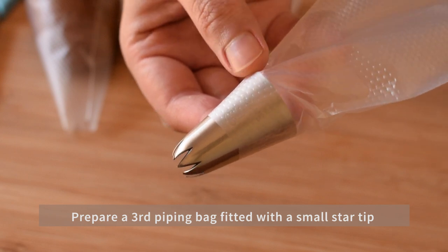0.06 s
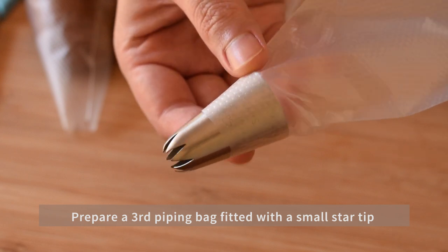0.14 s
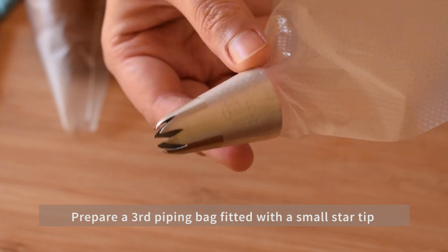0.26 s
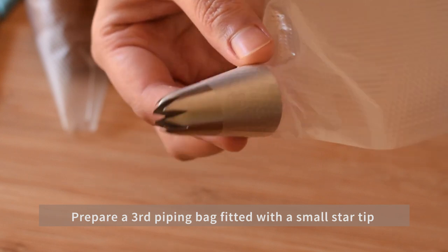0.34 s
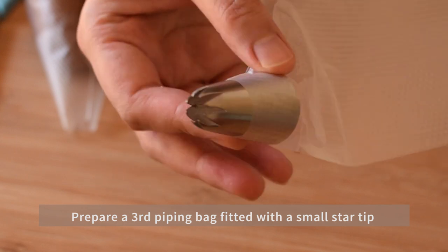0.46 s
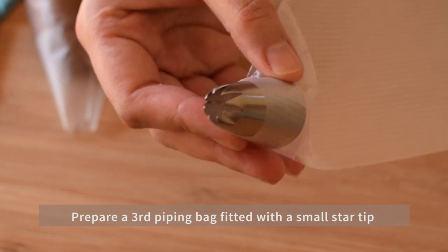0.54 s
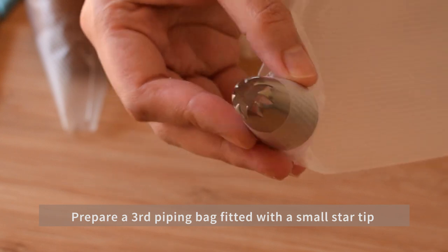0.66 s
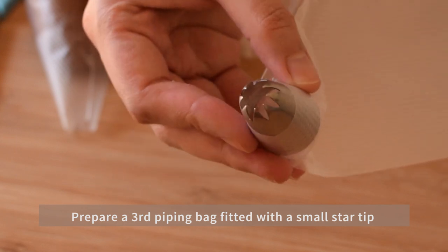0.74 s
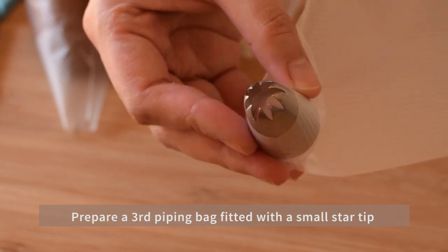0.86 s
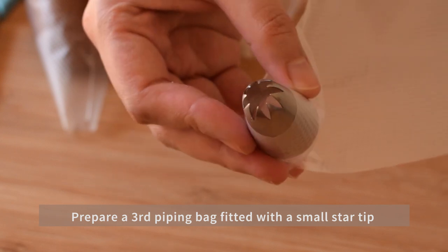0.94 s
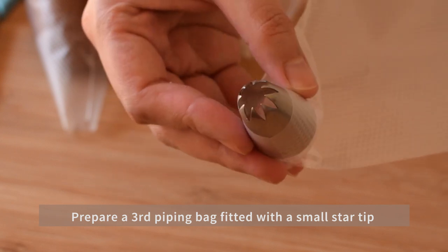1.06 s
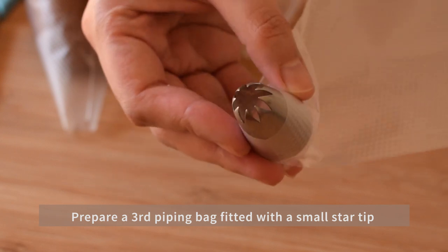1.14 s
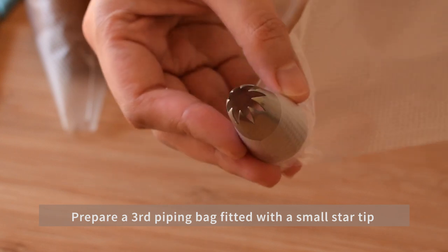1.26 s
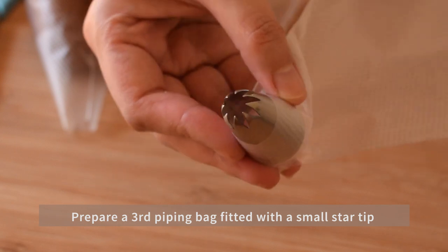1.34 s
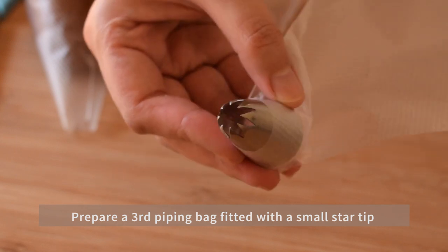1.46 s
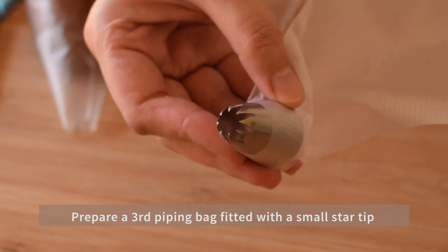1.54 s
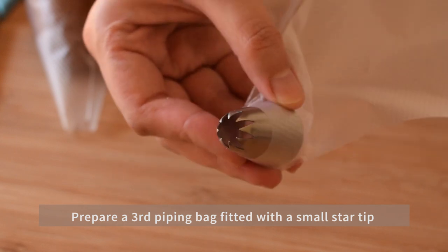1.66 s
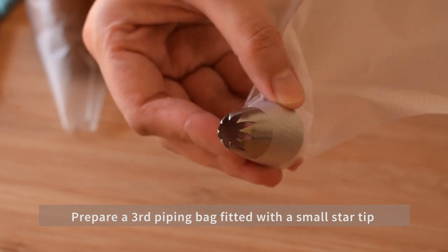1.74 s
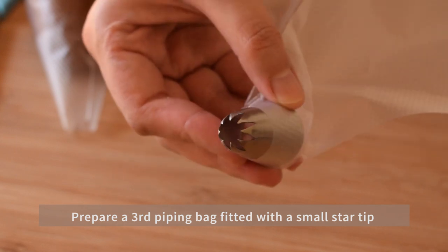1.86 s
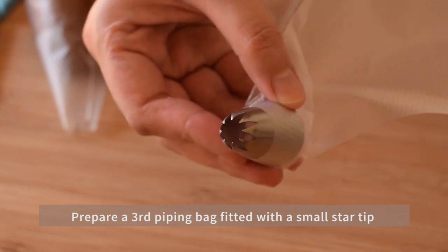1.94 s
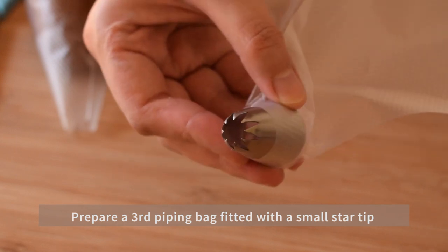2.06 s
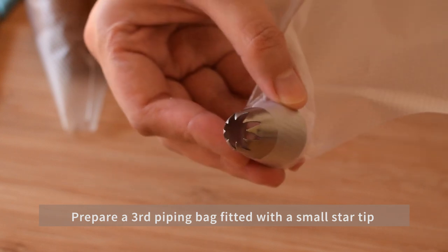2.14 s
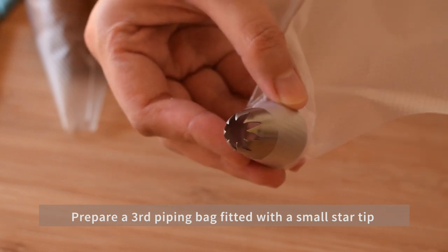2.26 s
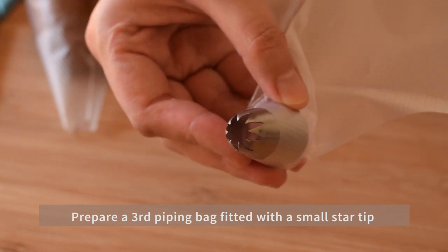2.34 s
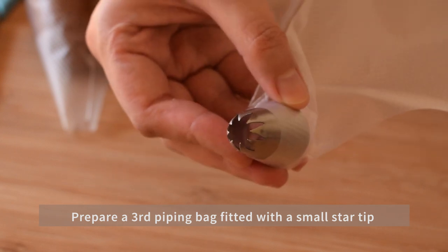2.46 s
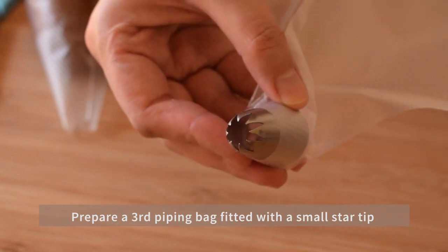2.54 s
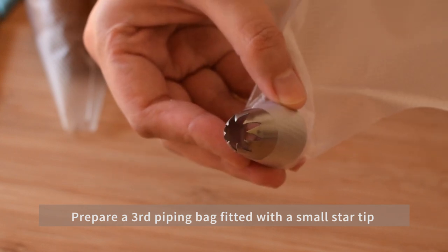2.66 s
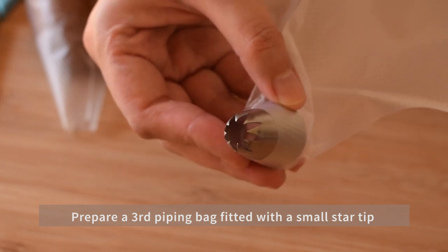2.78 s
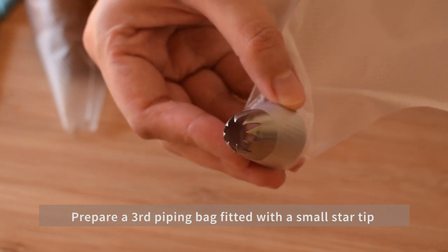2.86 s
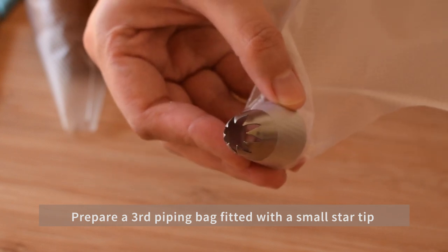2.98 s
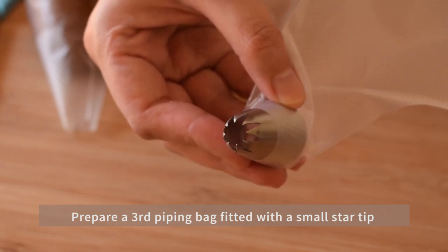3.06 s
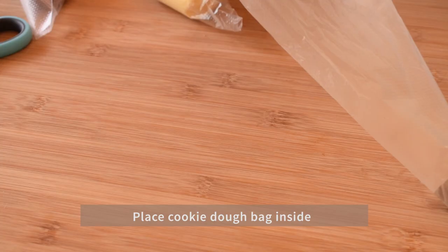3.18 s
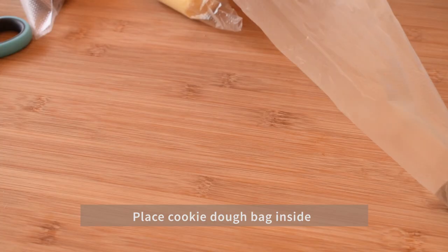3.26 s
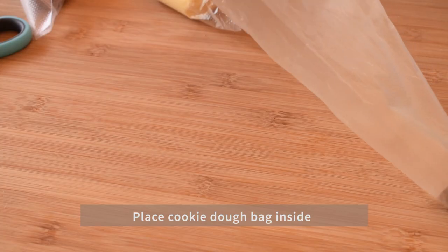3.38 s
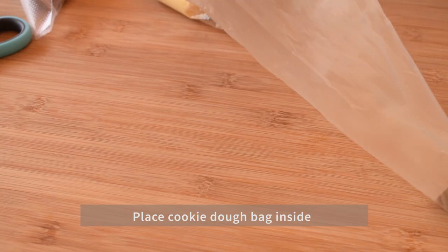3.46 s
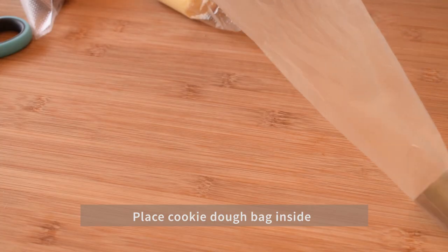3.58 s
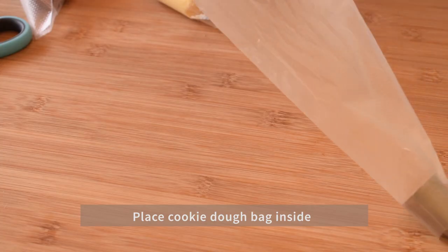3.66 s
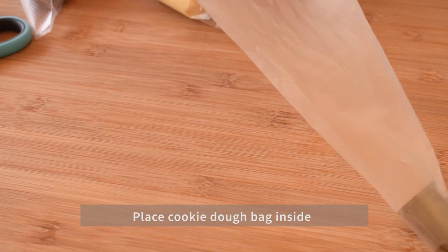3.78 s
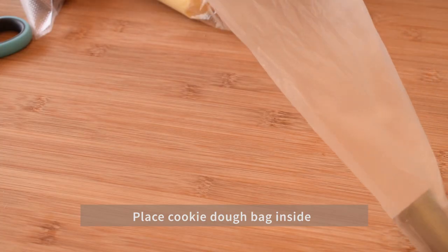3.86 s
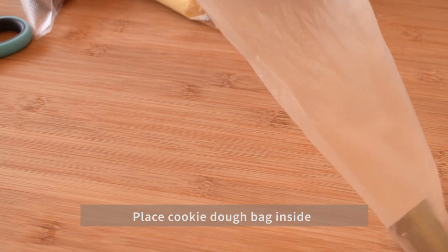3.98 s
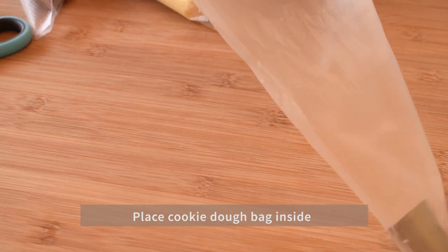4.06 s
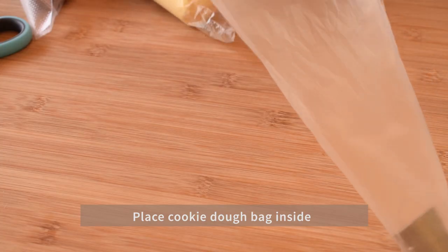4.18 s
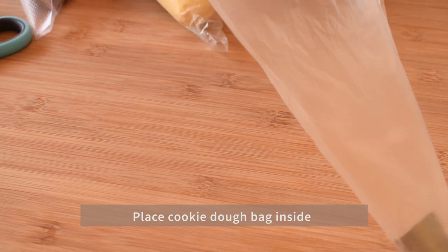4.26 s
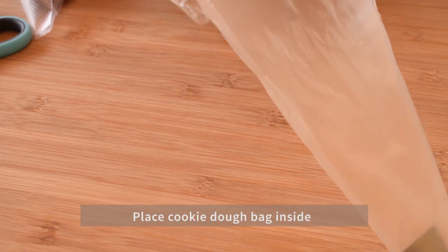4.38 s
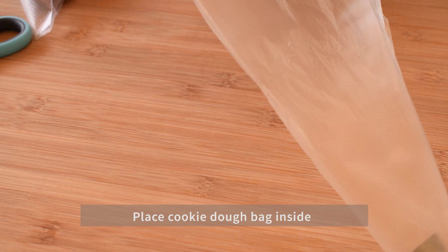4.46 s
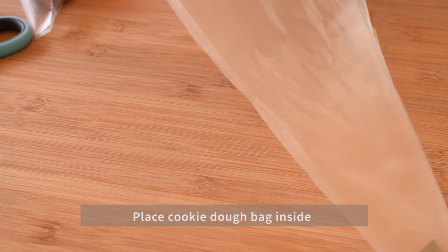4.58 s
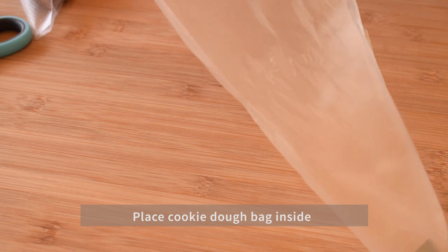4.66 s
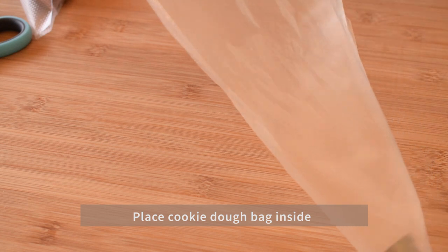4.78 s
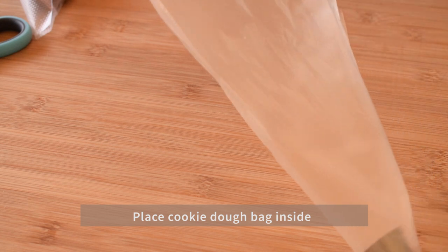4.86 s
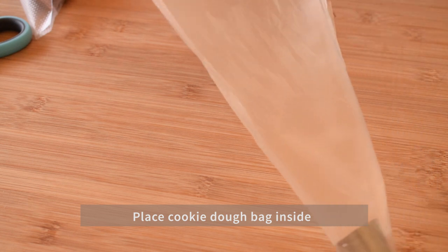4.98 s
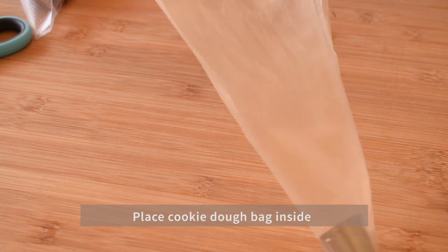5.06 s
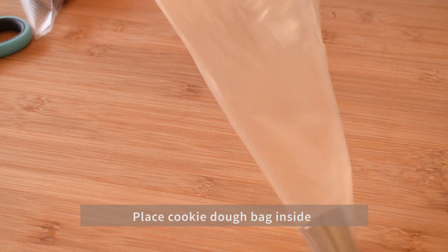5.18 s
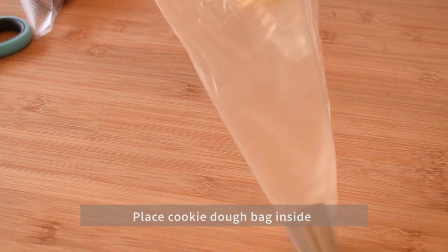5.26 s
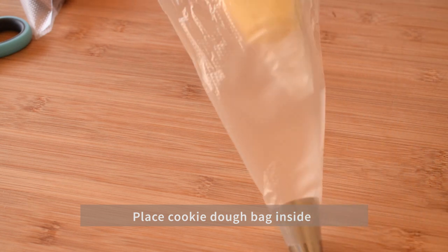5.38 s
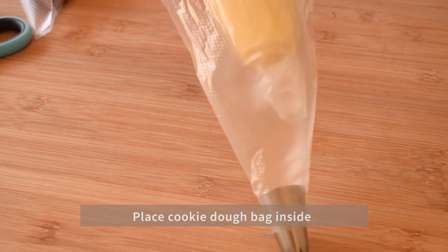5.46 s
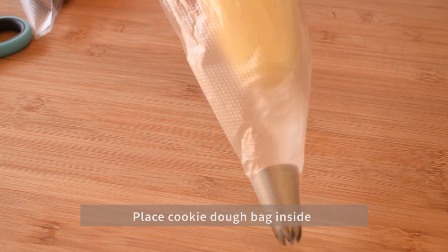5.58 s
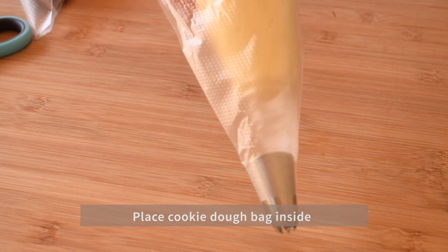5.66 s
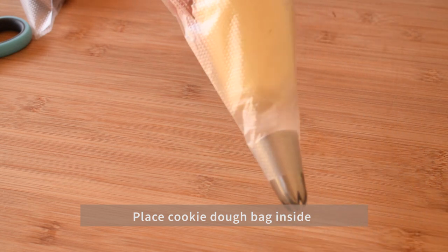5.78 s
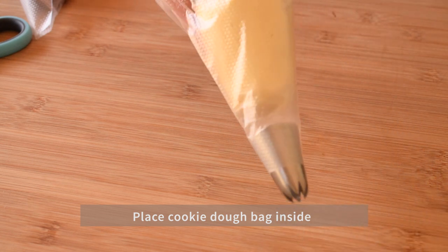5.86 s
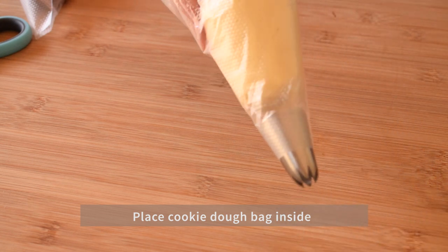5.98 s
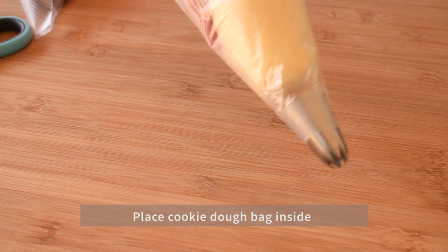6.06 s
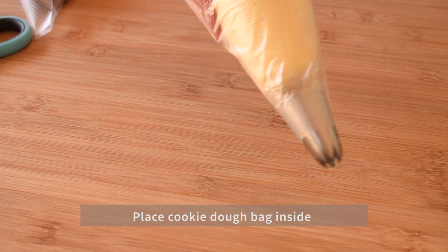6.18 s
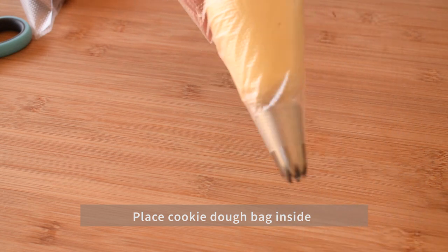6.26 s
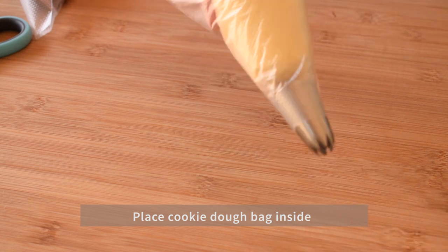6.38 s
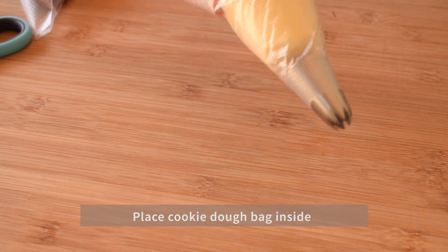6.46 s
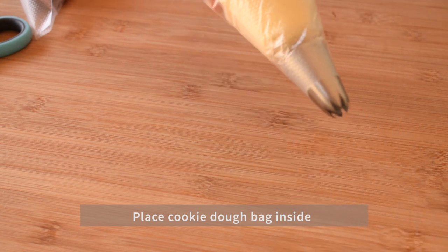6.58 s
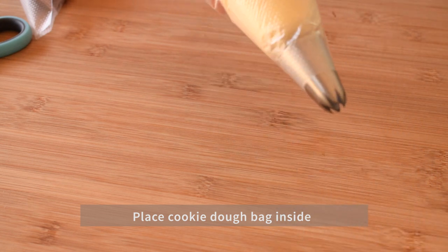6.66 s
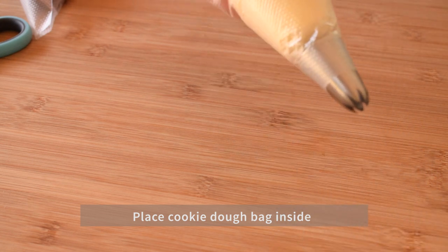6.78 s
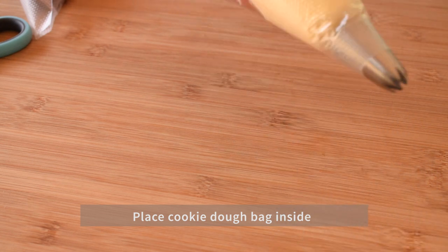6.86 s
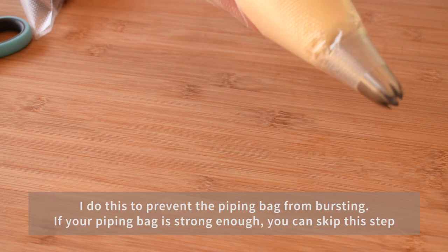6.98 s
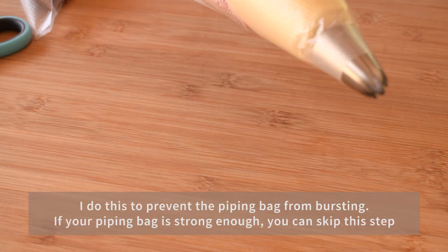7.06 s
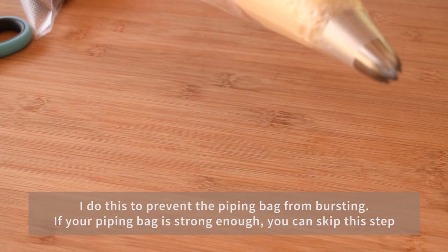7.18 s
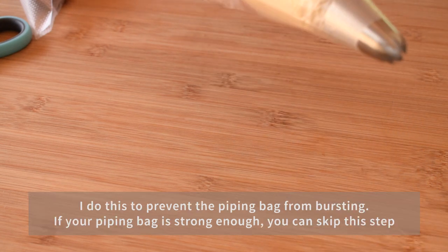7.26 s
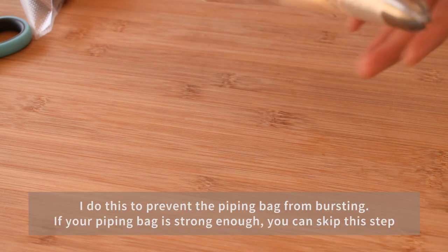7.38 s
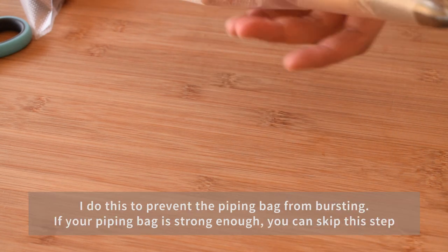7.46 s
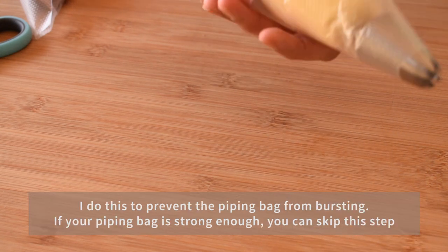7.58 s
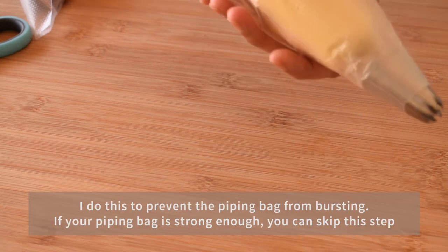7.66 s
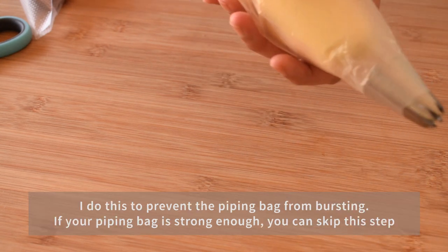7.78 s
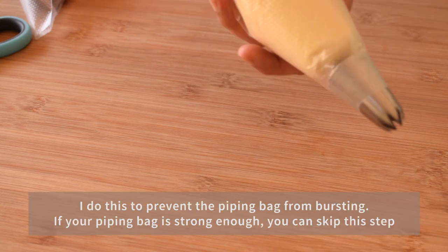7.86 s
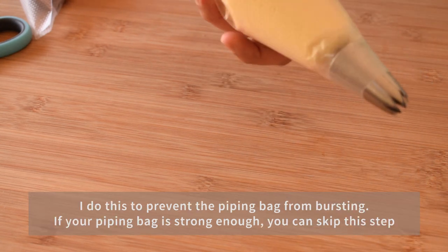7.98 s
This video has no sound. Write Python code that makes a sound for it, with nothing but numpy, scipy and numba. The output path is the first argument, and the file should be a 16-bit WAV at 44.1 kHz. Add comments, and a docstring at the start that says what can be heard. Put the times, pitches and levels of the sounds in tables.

```python
"""A thin plastic piping bag is handled close by, held still, then opened and stuffed with a bag of dough.
Creases snap as short noise bursts that ring; rubbed film crackles as a crowd of tiny noise grains.
Smooth sliding adds a narrow hiss, and the air inside the bag rings along with snaps and crackle.
Behind it is a small kitchen: short reflections, low room noise, mains hum and a faint, pulsing
electrical whine made of a sagging squeal and a nearly steady tone."""
import sys
import numpy as np
from scipy import signal
from scipy.fft import rfft, irfft, next_fast_len
from scipy.io import wavfile
from scipy.ndimage import uniform_filter1d
from numba import njit

SR = 44100
rng = np.random.default_rng(int(sys.argv[2]) if len(sys.argv) > 2 else 0)


def wrap_up_sound(samples):
    """Save the sound to the file named by the first command line argument, as 16-bit audio."""
    columns = np.atleast_2d(samples).T
    # keep every value between -1 and 1, then stretch to whole-number steps
    tamed = np.clip(columns, -1, 1)
    steps = np.round(tamed * 32767).astype(np.int16)
    wavfile.write(sys.argv[1], SR, steps)


N = 354123  # length in samples

# distinct snaps of the film, loud or faint, each at its own time:
# [t/s, level/dB (rms if spread over 5 ms), f/Hz of the ring, decay/s]
DISTINCT_SNAPS = [(0.0126, -9, 3300, 0.00072), (0.034, -11, 4400, 0.0012), (0.1568, -11.5, 2450, 0.0044),
                  (0.2052, -13.5, 2890, 0.0015), (0.2426, -9, 3000, 0.0017), (0.2703, -14, 3126, 0.0011),
                  (.318, -18, 3280, 0.00081), (0.5556, -9.5, 3360, 0.0029), (0.3878, -17.5, 2970, .0019),
                  (0.4048, -17.5, 3480, 0.0005), (0.4888, -13, 2540, 0.0018), (0.6252, -17.5, 1860, 0.0022),
                  (0.7543, -28, 905, 0.0015), (.801, -26, 6970, 0.00052), (0.8318, -12, 7900, 0.00046),
                  (0.8369, -16.5, 1950, 0.0026), (0.898, -16, 5600, 0.0007), (.992, -27.5, 3020, 0.0018),
                  (1.1278, -18.5, 1150, 0.0036), (1.24, -22.5, 2180, 0.00076), (1.255, -25.5, 2200, 0.0016),
                  (1.284, -30, 2020, 0.0018), (1.403, -33, 4260, 0.001), (1.5204, -37.5, 744, 0.0045),
                  (1.5891, -31, 3120, 0.0015), (1.6128, -35, 1130, 0.0024), (1.6898, -23, 1400, 0.00061),
                  (1.8963, -37.5, 1290, .0007), (1.9314, -24.5, 4800, 0.0011), (2.153, -35, 880, 0.001),
                  (2.8521, -23, 1510, 0.0014), (2.8674, -33, 980, .003), (2.9904, -29.5, 2570, 0.00082),
                  (3.2523, -25.5, 2500, 0.001), (3.3395, -14.5, 4530, 0.00062),
                  (3.3789, -9.5, 4420, 0.0013), (3.4211, -17, 7200, 0.00033), (3.478, -16.5, 3300, 0.00044),
                  (3.55, -17.5, 2420, 0.0014), (3.5696, -10, 3630, 0.0011), (3.7253, -15.5, 3730, .0017),
                  (3.784, -16, 2560, 0.00072), (3.8093, -18.5, 2220, 0.0012), (3.83, -19, 2490, 0.002),
                  (3.9065, -19.5, 2360, 0.0032), (3.9561, -18, 3520, 0.00091), (4.0253, -8, 5400, 0.0066),
                  (4.0528, -12.5, 2580, .0019), (4.188, -17.5, 5200, 0.0015),
                  (4.2667, -17.5, 2260, 0.00067), (4.439, -22.5, 4010, .0006), (4.5698, -22, 2900, 0.0014),
                  (4.584, -20, 2850, 0.0001), (4.615, -26, 2830, .0025), (4.6692, -21.5, 2830, .0028),
                  (4.7113, -18.5, 2870, 0.00055), (4.7751, -23, 1370, 0.0033),
                  (5.1033, -13.5, 5300, 0.0024), (5.1748, -11.5, 2170, 0.0025), (5.2556, -20, 7050, .0005),
                  (5.2944, -17, 6540, 0.00083), (5.333, -11.5, 3250, 0.0017), (5.4503, -14.5, 3360, 0.0019),
                  (5.5927, -10, 2880, 0.0075), (5.7439, -8.5, 3220, 0.0048), (5.789, -9, 2700, 0.0094),
                  (6.7594, -10, 3100, 0.0074), (6.88, -10, 7750, 0.0014), (7.0794, -15.5, 6340, .001)]
# how strongly a crease sounds at each frequency: [f/Hz, level/dB]
CREASE_SPECTRUM = [(40, -52), (110, -33), (215, -19), (364, -20), (520, -2.5), (740, 2.5), (1070, -2),
                   (1900, -1), (3200, -3.5), (5600, 1), (8300, -3.5), (10200, -2), (13300, -4.5),
                   (16000, -22)]


def snaps():
    """A crease cracks, slips in a noisy burst, rings its patch of film and leaves the sheet fluttering."""
    lead, size = 512, 2048  # samples before the crack, and in the whole snap
    broad_q, ring_q, ring, overtones = 0.46, 7, 0.99, 0.44
    rise = 0.17  # build-up time as a fraction of the decay time
    crack, flutter_db, flutter_s = 2, -21, 0.011
    low_cut = 0.15  # as a fraction of the ring frequency
    out = np.zeros(N + 2 * size)
    t = (np.arange(size) - lead) / SR
    for s, db, hz, decay_s in DISTINCT_SNAPS + random_creases():
        burst = np.exp(-np.maximum(t, -t / rise) / max(decay_s, 1e-4))
        flutter = undb(flutter_db) * (t > 0) * np.exp(-np.abs(t) / flutter_s)
        slips = rng.standard_normal(size) * (burst + flutter) + crack * (t == 0)
        # no two patches have the same shape: each has three sharp modes of its own
        modes = hz * 2 ** rng.uniform(-0.94, 1.89, size=3)

        def response(f):
            patch = 1 + ring * resonance(f, hz, ring_q)
            patch = patch + overtones * sum(resonance(f, mode, 2 * ring_q) for mode in modes)
            # a small patch hardly sounds far below its ring
            baffle = f / (f - 1j * low_cut * hz)
            return shape(CREASE_SPECTRUM, f) * resonance(f, hz, broad_q) * patch * baffle

        snap = filtered(slips, response)
        snap *= np.sqrt(SR / 200 / np.sum(snap ** 2))  # same energy for every snap before its level
        start = max(int(s * SR), 0)
        out[start:start + size] += undb(db) * snap
    return out[lead:lead + N]


def random_creases():
    """More creases give way at random as the film bends; in slack film they stand out and ring lower."""
    count, crowding = 130, .025  # crowding: growth of the rate per dB of rustle
    over_db, stand_out = -1, 0.41  # level above the rustle, and extra dB per dB of slack
    ring_hz, sag_octaves_per_db, scatter_octaves = 3700, 0.05, 0.48
    typical_decay_s = 0.00061
    level_db, _ = handling()
    t = np.arange(N) / SR
    gliding = (t > SLIDE_SPAN[0]) & (t < SLIDE_SPAN[1])
    strain = np.cumsum((level_db > STILL_DB) * ~gliding * np.exp(crowding * level_db))
    # equal shares of strain are equally likely to hold a crease
    at = np.searchsorted(strain, strain[-1] * rng.random(count))
    slack_db = HARD_DB - level_db[at]
    pitch, length = rng.standard_normal((count, 2)).T
    db = level_db[at] + over_db + stand_out * slack_db
    hz = ring_hz * 2 ** (scatter_octaves * pitch - sag_octaves_per_db * slack_db)
    return list(zip(at / SR, db, hz, typical_decay_s * np.exp(.5 * length)))


# how strongly the rubbed sheet sounds at each frequency: [f/Hz, level/dB]
FILM_SPECTRUM = [(40, -56), (130, -25.5), (230, -15.5), (364, -6), (550, -10), (750, -5), (1070, -6.5),
                 (1900, -3.5), (3200, -1), (5600, 3.5), (8300, -5.5), (10200, -2.5), (13300, -9.5),
                 (16000, -21.5)]


def rustle():
    """Tiny buckles crowd together as the film is worked harder; each favours its own frequency bands."""
    gain_db, rate, crowding = -1, 1100, .07  # rate: buckles/s without slack; crowding: loss per dB of slack
    spread_db, patch_db = 3.5, 4.5  # spread of the buckles' sizes, overall and band by band
    grain_s, treble_hz = 0.0012, 4500  # a buckle's energy decay at treble_hz
    rub, drift_db = 0.19, 0.58
    body_db, body_hz, flap = -1, 500, 0.43  # flap: dB of low body per dB of slack
    level_db, lift_db = handling()
    slack_db = HARD_DB - level_db
    # film that is held still does not buckle
    moving = level_db > STILL_DB
    at = np.flatnonzero(rng.random(N) < moving * rate * np.exp(-crowding * slack_db) / SR)
    size_db = spread_db * rng.standard_normal(len(at))
    centres = np.linspace(200 ** (1 / 3), 14000 ** (1 / 3), 15) ** 3  # band centres in Hz
    film_rms = np.sqrt(np.mean(shape(FILM_SPECTRUM, np.linspace(0, SR / 2, 2000)) ** 2))
    out = np.zeros(N)
    for k, hz in enumerate(centres):
        buckles = np.zeros(N)
        buckles[at] = undb(size_db + patch_db * rng.standard_normal(len(at))) ** 2
        # large, low patches of film ring longer than small ones
        energy = decay(buckles, grain_s * (treble_hz / hz) ** 0.68)
        # the hand's work is shared out among the buckles and a smooth rub
        energy = energy / (np.abs(uniform_filter1d(energy, size=1800)) + 1e-6) + rub
        treble = hz ** 2 / (hz ** 2 + treble_hz ** 2)
        body = body_hz ** 2 / (hz ** 2 + body_hz ** 2)
        # taut film is bright; slack film keeps its soft, low flap
        colour_db = (lift_db - 5.5) * (treble - .5) + body * (body_db + flap * slack_db)
        force_db = level_db + colour_db + drift_db * walk(22)
        force = rng.standard_normal(N) * np.sqrt(energy) * undb(force_db)

        def band(f):
            # neighbouring bands overlap and their powers add up to one
            share = np.interp(np.log(f + 1), np.log(centres), np.arange(len(centres)) == k)
            return shape(FILM_SPECTRUM, f) * np.sqrt(share)

        out += filtered(force, band)
    return out * undb(gain_db) / film_rms


HARD_DB, STILL_DB = -11, -56  # rustle level that counts as no slack, and below which the film lies still
LIMP_DULLING = 0.14  # treble lift lost by creeping film, dB per dB of slack
STROKE_ATTACK_S, STROKE_RELEASE_S = .011, 0.018  # for a stroke of typical length
TYPICAL_STROKE_S, EASE = .04, .3  # longer strokes swell and fade more slowly: exponent of their length
# a hand pulls or pushes the film: [t/s, length/s, level/dB of the rustle, treble lift from tension/dB]
HAND_STROKES = [(.01, .025, -22, -6.5), (0.137, .07, -23.5, -6), (0.244, .06, -20, 0),
                (.41, .02, -20, -4.5), (0.497, 0.055, -19, -3), (.63, .02, -27.5, 4), (0.837, .02, -29, -2),
                (.895, .02, -37, 1), (3.24, .025, -30.5, -11), (3.357, .022, -15.5, 3),
                (3.498, .03, -26, 5), (3.572, .028, -24, -6), (3.739, .012, -23, -4), (3.809, .022, -21, 0),
                (3.967, .03, -25.5, -3), (4.031, .06, -18, -1.5), (4.2, .015, -19, -4),
                (4.286, .025, -18.5, -6.5), (4.674, .025, -30.5, -8), (5.085, .02, -22, 0),
                (5.166, .01, -17, 4.5), (5.24, .05, -22, -1), (5.344, .2, -19, 1), (5.578, .22, -16, 2),
                (5.859, .19, -16.5, 2.5), (6.09, .045, -14, -2.5), (6.235, .09, -16.5, 1),
                (6.373, .1, -13.5, -0.5), (6.542, .085, -17, 1), (6.665, .04, -19, -1),
                (6.808, .06, -22, -2), (6.943, .06, -15.5, -2), (7.086, .012, -18, -3),
                (7.153, .065, -13, 1.5), (7.379, .14, -17.5, 2.5), (7.553, .21, -14.5, 2),
                (7.881, .035, -12, 2.5), (7.996, .04, -15.5, 4)]
# between strokes the film creeps under the grip: [t/s, level/dB of the rustle]
GRIP_CREEP = [(.09, -50), (.35, -40), (.65, -42.5), (.95, -44.5), (1.05, -55), (1.16, -43), (1.4, -51),
              (1.65, -52), (1.8, -60), (3.19, -58), (3.26, -35.5), (4.4, -33.5), (4.88, -42.5), (5.06, -35),
              (5.45, -22), (6.2, -24.5), (6.7, -24), (7.28, -34), (7.36, -23.5), (8.03, -23)]


def handling():
    """Rustle level and treble lift in dB: strokes swell, hold and die away over the creep of the grip."""
    t = np.arange(0, N / SR + .001, .001)
    creep_db = np.interp(t, *np.transpose(GRIP_CREEP))
    power = undb(creep_db) ** 2
    weighted_lift = power * LIMP_DULLING * (creep_db - HARD_DB)
    for start, length, db, lift_db in HAND_STROKES:
        before = np.maximum(start - t, 0) / STROKE_ATTACK_S
        after = np.maximum(t - start - length, 0) / STROKE_RELEASE_S
        slowness = (length / TYPICAL_STROKE_S) ** EASE
        work = (undb(db) * np.exp(-(before + after) / slowness)) ** 2
        power = power + work
        weighted_lift = weighted_lift + work * lift_db
    # the strongest movement weighs most in the treble
    curves = (10 * np.log10(power), weighted_lift / power)
    return [np.interp(np.arange(N) / SR, t, curve) for curve in curves]


# narrow bands of hiss from the smoothly sliding bag: [f/Hz, half-width/Hz at 6 dB down, level/dB]
SLIDE_BANDS = [(3170, 370, -45.5), (11350, 220, -53), (12150, 200, -53)]
# when the bag slides: [start t/s, end t/s]
SLIDE_SPAN = (4.79, 5.08)


def slide():
    """Film glides over film without buckling, which gives noise in narrow bands."""
    fade_s = 0.0092
    t = np.arange(N) / SR
    start, end = SLIDE_SPAN
    gate = np.clip(np.minimum(t - start, end - t) / fade_s, 0, 1)
    hiss = np.zeros(N)
    for hz, width, db in SLIDE_BANDS:
        noise = rng.standard_normal(N)
        hiss += undb(db) * unit(filtered(noise, lambda f: resonance(f, hz, hz / width / 2) ** 2))
    return hiss * gate * undb(2 * walk(24))


# the air between the bag's walls changes with the grip: [t/s, f/Hz of its resonance, strength 0-1]
AIR_POCKET = [(.3, 2800, 0.44), (.8, 1950, 0.15), (2.9, 2170, 0.7), (3.3, 2130, 0.4), (4.35, 2100, 0.48),
              (4.55, 2650, 1), (4.95, 2880, 0.2), (5.25, 2260, 0.27), (5.6, 1830, 0.32), (6.2, 1820, 0.34),
              (7, 1720, 0.3), (7.4, 1850, 0.14)]


def pocket(x):
    """The air in the bag rings with the film and hollows out the range just below its resonance."""
    damping, ring, hollow = .13, 1.4, 0.17
    s, *columns = np.transpose(AIR_POCKET)
    hz, strength = (np.interp(np.arange(N) / SR, s, c) for c in columns)
    band, high = moving_resonance(x, hz, damping)
    return (x + strength * (ring * band + hollow * high)) / (1 + 2 * hollow * strength)


@njit
def moving_resonance(x, hz, damping):
    """State-variable filter with a moving centre; returns its band and high outputs."""
    band, high = np.empty(len(x)), np.empty(len(x))
    b, l = 0., 0.  # the filter's two memories
    for i in range(len(x)):
        g = np.tan(np.pi * hz[i] / SR)
        v = (b + g * (x[i] + 1e-18 - l)) / (1 + g * (g + damping))
        low = l + g * v
        b, l = 2 * v - b, 2 * low - l
        band[i], high[i] = damping * v, x[i] - damping * v - low
    return band, high


def whine():
    """An electrical whine sags in pitch again and again beside a tone; it swells about ten times a second."""
    throb_hz, crest_s, throb_db = 10.394, .981, 4.5  # the level swings up and down by throb_db
    unsteady = 0.034  # drift of the throb, in turns
    level_db, top_hz, dip_hz, wander_hz = -53, 6080, 740, 150
    sweeps, rough_db = 82, 2  # sweeps: typical sags per second
    tone_hz, tone_db, chirp_db = 5975, -7, 7  # dB relative to the squeal
    t = np.arange(N) / SR
    turn = throb_hz * (t - crest_s) + unsteady * walk(6.5)
    sag = np.cumsum(sweeps * np.exp(.3 * walk(60))) / SR % 1
    hz = top_hz - dip_hz * sag ** 2 + wander_hz * walk(900)
    sweep = np.sin(2 * np.pi * np.cumsum(hz) / SR)
    squeal = unit(filtered(sweep, lambda f: resonance(f, 6030, 2.5) ** 2))
    tone_phase = 2 * np.pi * np.cumsum(tone_hz + 15 * walk(40)) / SR
    tone = undb(tone_db) * np.sqrt(2) * np.sin(tone_phase)
    # the squeal jumps up in a short, sharp chirp late in each swell
    chirp = np.exp(-((turn % 1 - .24) / 0.032) ** 2)
    squeal = squeal * undb(chirp_db * chirp + rough_db * walk(250))
    return (squeal + tone) * undb(level_db + throb_db * np.cos(2 * np.pi * turn))


def kitchen(x):
    """Quick reflections from worktop and cupboards, a weaker, longer tail and a brief low boom."""
    early_db, early_s, late_db, late_t60 = -18, 0.017, -21, 0.32  # levels before dulling
    boom_db, boom_t60, boom_hz = -14, 0.08, 320  # level before filtering
    gap_s, dull_hz = 0.0085, 8000
    t = np.arange(SR // 2) / SR

    def tail(db, tau):
        noise = rng.standard_normal(len(t)) * (t > gap_s) * np.exp(-t / tau)
        return undb(db) * unit(noise) / np.sqrt(len(t))

    echoes = tail(early_db, early_s) + tail(late_db, late_t60 / np.log(1000))
    echoes = filtered(echoes, lambda f: 1 / (1 + 1j * f / dull_hz))
    boom = filtered(tail(boom_db, boom_t60 / np.log(1000)), lambda f: resonance(f, boom_hz, 0.42))
    return x + signal.fftconvolve(x, echoes + boom)[:N]


# spectrum of the room noise: [f/Hz, level/dB]
ROOM_SPECTRUM = [(20, -10), (55, -26), (90, -1.5), (150, 0), (330, -3), (700, -8), (1500, -12), (4000, -17),
                 (10000, -19), (16000, -19)]


def room_noise():
    """Steady low air noise with a trace of mains hum, a plain sine."""
    air_db, hum_hz, hum_db = -49.5, 60, -64.5
    air = unit(filtered(rng.standard_normal(N), lambda f: shape(ROOM_SPECTRUM, f)))
    hum = np.sqrt(2) * np.sin(2 * np.pi * hum_hz * np.arange(N) / SR)
    return undb(air_db) * air + undb(hum_db) * hum


def undb(db):
    """Turn decibels into a gain."""
    return 10 ** (np.asarray(db) / 20)


def unit(x):
    """Scale to rms 1."""
    return x / np.sqrt(np.mean(x ** 2) + 1e-20)


def shape(points, hz):
    """Gain of an [f/Hz, level/dB] spectrum at the given frequencies."""
    f, db = np.transpose(points)
    return undb(np.interp(np.log(hz + 1), np.log(f), db))


def resonance(hz, centre_hz, q):
    """Complex response of one resonance, gain 1 at its centre."""
    r = (hz + 1) / centre_hz  # 1 Hz is added to avoid dividing by zero
    return 1 / (1 + 1j * q * (r - 1 / r))


def filtered(x, response):
    """Pass x through a response given as a function of frequency."""
    size = next_fast_len(len(x) + 1024)
    hz = np.arange(size // 2 + 1) * SR / size
    return irfft(rfft(x, size) * response(hz), size)[:len(x)]


def walk(rate):
    """Random drift with a spread near 1, in straight lines between `rate` random points per second."""
    knots = rng.standard_normal(int(N / SR * rate) + 2)
    return np.sqrt(3 / 2) * np.interp(np.arange(N) / SR * rate, np.arange(len(knots)), knots)


def decay(x, seconds):
    """Every pulse of x dies away exponentially."""
    return signal.lfilter([1], [1, -np.exp(-1 / (seconds * SR))], x)


def scene():
    """The bag and the whine sound in the kitchen, over its background."""
    bag = pocket(snaps() + rustle()) + slide()
    return (kitchen(bag + whine()) + room_noise())[None]


def record(dry):
    """The recorder rounds off the tallest peaks and cuts the top."""
    top_hz = 15900
    limited = dry / (1 + dry ** 4) ** (1 / 4)
    return signal.sosfilt(signal.ellip(10, .2, 70, top_hz, fs=SR, output="sos"), limited)


dry = scene()
out = record(dry)
wrap_up_sound(out)
```